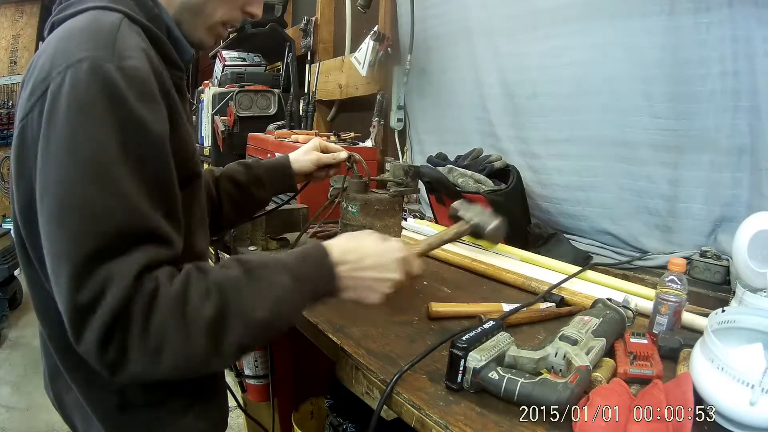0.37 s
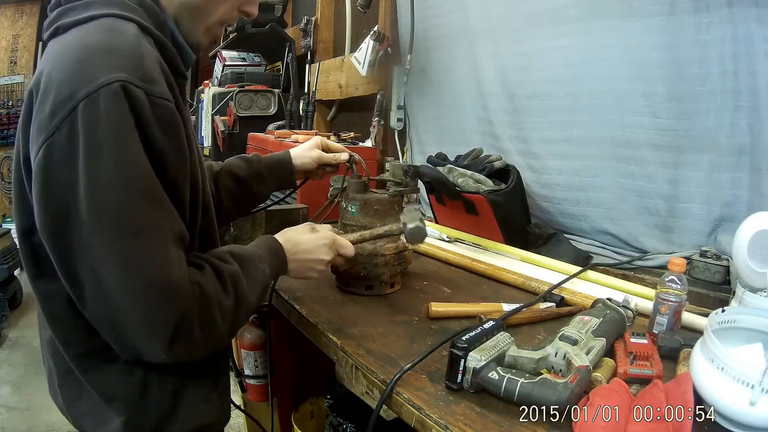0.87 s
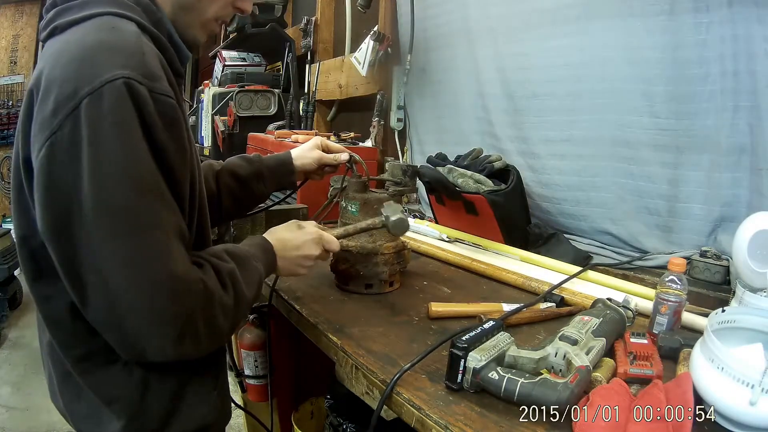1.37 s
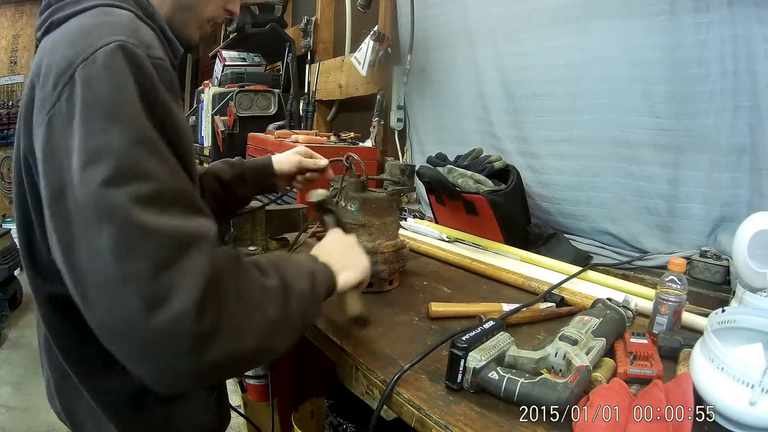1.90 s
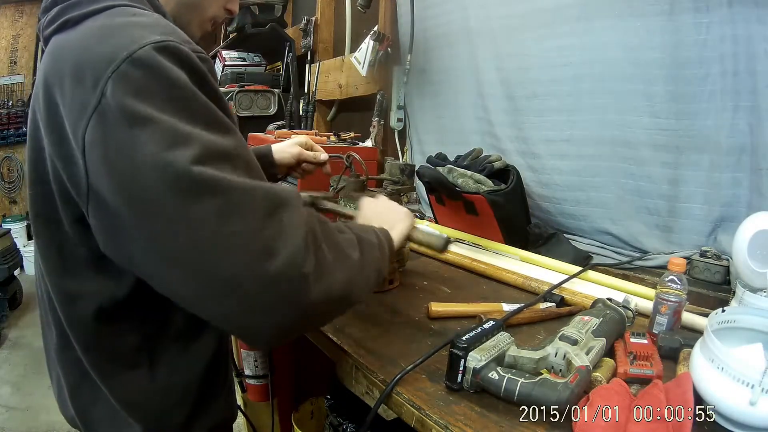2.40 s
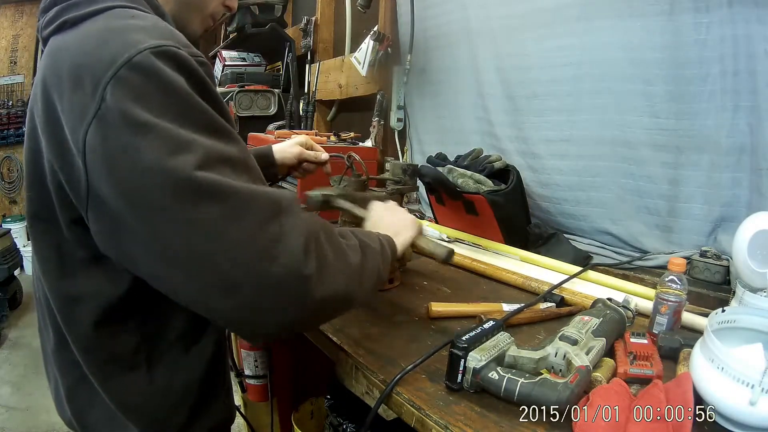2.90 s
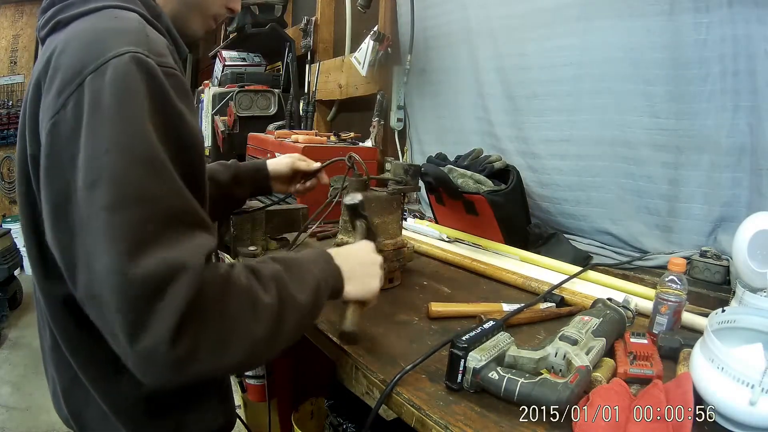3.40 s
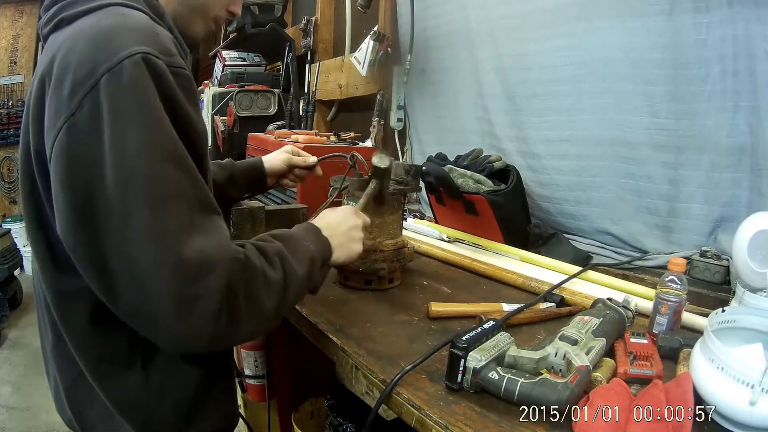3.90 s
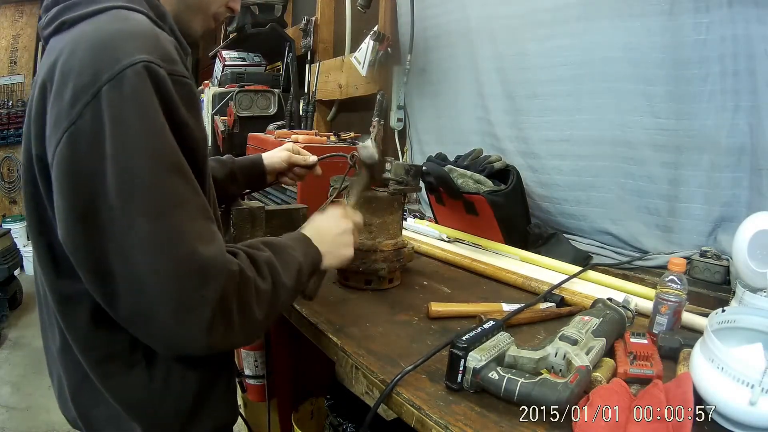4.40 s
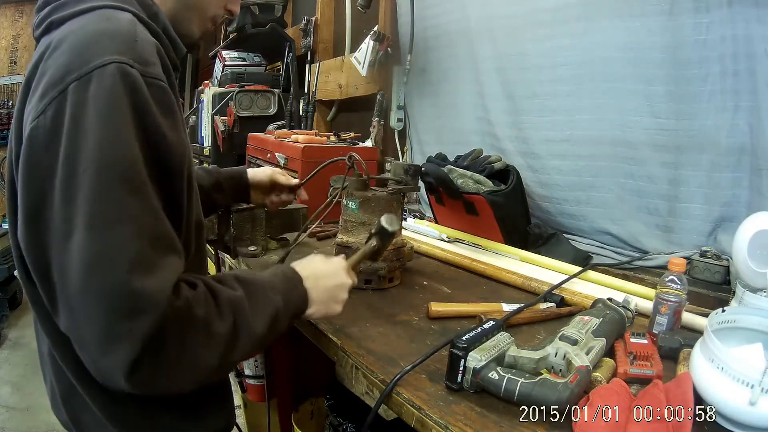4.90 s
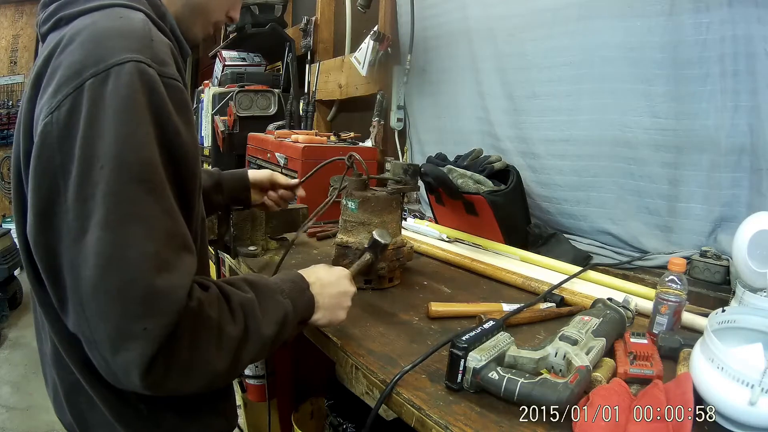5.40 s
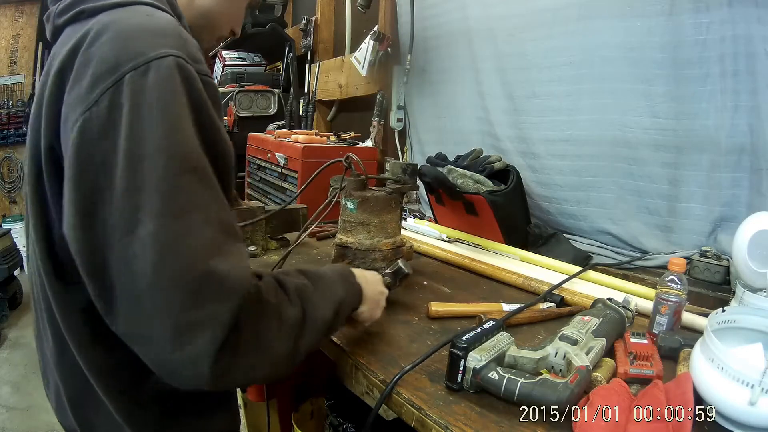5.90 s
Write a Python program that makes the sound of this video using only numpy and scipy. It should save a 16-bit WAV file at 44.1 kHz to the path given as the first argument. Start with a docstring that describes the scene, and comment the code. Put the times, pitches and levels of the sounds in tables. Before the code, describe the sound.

Faint room rumble and thin, bright recorder hiss with a weak electronic whine lie under everything, with tiny scattered ticks. At about 0.04 and 0.08 seconds a tool clacks lightly on a wooden bench. A hammer then strikes a rusty cast metal housing: a soft blow at 0.7, then harder ones at 0.97, 1.2 and 1.45. A second run, sharper and clankier, falls at 2.2, a weaker start, then 2.45, 2.7 and 2.9. After a second's pause three heavier blows come at 3.9, 4.2 and 4.4, each louder, the last hardest and brightest. Every blow is a blunt knock with a short, damped clang, low bench thud and roughly half-second garage tail. The close small recorder clips on the blows and dips afterwards. Quiet follows; faint bumps near 5.45, then a duller, clearer wooden tool clatter at 5.7 to 5.8 fades by 6.

```python
"""Over faint room air and recorder hiss, tools bump on a wooden bench in a garage, with tiny ticks about.
A hammer then knocks in three quick runs on a rusty cast pump housing on that bench; tools bump again after.
Housing and bench are struck modes, the rusty wall's clang is dying noise, and the garage carries a noise tail.
A small recorder overloads on the blows, ducks its gain after them and turns its hiss down in the quiet."""
import sys
import numpy as np
from scipy import signal
from scipy.fft import rfft, irfft, next_fast_len
from scipy.io import wavfile
from scipy.ndimage import uniform_filter1d, minimum_filter1d

SR = 44100
rng = np.random.default_rng(int(sys.argv[2]) if len(sys.argv) > 2 else 0)


def linear_from_db(decibels):
    """Turn decibels (scalar or array-like) into linear amplitude factors; 0 gives 1."""
    return 10 ** (np.asarray(decibels, float) / 20)


def wav_out(sig):
    """Save sig, one row per channel (or a flat mono array), as 16-bit PCM at SR to the path in sys.argv[1]."""
    wavfile.write(sys.argv[1], SR, np.round(np.clip(np.atleast_2d(sig).T, -1, 1) * 32767).astype(np.int16))


N = 265923   # samples

# Hammer blows. Each row: start in seconds, strength in dB at the flange, clank in dB over that.
BLOWS = [(0.6987, -12, -2), (0.9738, 2.5, -4.5), (1.218, 2.5, -3), (1.45, 5.5, -2), (2.185, -6, 1.5),
         (2.442, 3.5, 5), (2.6921, 4.5, 5), (2.9299, 4, 7.5), (3.9211, 6.5, -7.5), (4.1878, 11.5, -3),
         (4.4375, 15.5, 4.5)]
# Tools bumping on the bench. Each row: start in seconds, level in dB, brightness in dB per octave,
# rattle decay in seconds, extra boom in dB.
BUMPS = [(0.037, -22.5, 1, 0.011, -17.5), (0.084, -24.5, -5.5, 0.0054, -21), (0.186, -56, 10, 0.013, 19),
         (5.445, -52, -7, .006, -13), (5.476, -38.5, -7.5, 0.0054, -21), (5.695, -16.5, 2, 0.0096, 2),
         (5.761, -22.5, 1.2, 0.017, 1.5), (5.815, -36.5, 5.5, 0.015, -3), (5.926, -49, 8.5, 0.043, 29.5),
         (6.01, -53, -5, 0.0065, 20)]


def table(points, hz):
    """Reads (Hz, value) points on a log frequency axis."""
    points_hz, values = np.array(points).T
    return np.interp(np.log(hz), np.log(points_hz), values)


def ring(clicks, hz, t60):
    """A mode: a unit click sets a sine of height 1 ringing, down 60 dB after t60 seconds."""
    loss = linear_from_db(-60 / (t60 * SR))
    turn = 2 * np.pi * hz / SR
    return signal.lfilter([0, np.sin(turn)], [1, -2 * loss * np.cos(turn), loss * loss], clicks + 1e-18)


def struck(clicks, hz, t60, build_s):
    """A mode whose swing takes a moment to build: a short resonance feeds on the long one."""
    return ring(ring(clicks, hz, t60), hz, build_s) * 2 * np.log(1000) / (build_s * SR)


def smooth(x, seconds):
    """One-pole low-pass, started at the first value."""
    r = np.exp(-1 / (seconds * SR))
    return signal.lfilter([1 - r], [1, -r], x - x[0]) + x[0]


def drift(rate):
    """Slow chance: random points of spread 1, rate per second, joined by straight lines."""
    count = int(N / SR * rate) + 2
    points = rng.standard_normal(count)
    return np.interp(np.arange(N) / SR * rate, np.arange(count), points)


def third_octaves():
    """Third-octave band-passes with their centres, from 22 Hz up."""
    edges = 22 * 2 ** (np.arange(30) / 3)
    return [(np.sqrt(low * high), signal.butter(2, [low, high], "band", fs=SR, output="sos"))
            for low, high in zip(edges, edges[1:])]


def coloured(spectrum, together_db, own_db):
    """Noise of a given spectrum whose bands flicker, together and alone; rms 1."""
    white = rng.standard_normal((2, N))
    together = drift(14.0)
    noise = 0
    for k, (hz, sos) in enumerate(third_octaves()):
        flicker = linear_from_db(together_db * together + own_db * drift(30.0))
        noise = noise + flicker * signal.sosfilt(sos, white[k % 2]) / np.sqrt(hz)
    size = next_fast_len(N)
    hz = np.maximum(np.fft.rfftfreq(size, 1 / SR), 1)
    # sqrt(hz) undoes the tilt given to the bands
    shape = np.sqrt(hz) * linear_from_db(table(spectrum, hz))
    noise = irfft(rfft(noise, size) * shape, size)[:N]
    return noise / np.std(noise)


def air():
    """The quiet rumble and rustle of the room, as flickering coloured noise."""
    # Room air. Each row: frequency in Hz, density in relative dB per Hz.
    air_spectrum = [(15, -23.5), (25, -3), (69, -6.5), (160, -17.5), (323, -25.5), (364, -23), (442, -28),
                    (789, -29.5), (911, -30.5), (1190, -34.5), (1670, -35.5), (1790, -36.5), (3880, -36),
                    (4940, -38.5), (8000, -41), (10400, -61), (17600, -120)]
    rms_db = -54
    return linear_from_db(rms_db) * coloured(air_spectrum, together_db=1.2, own_db=1.5)


def hiss():
    """The recorder's own bright hiss and steady-pitched electronic whine of wavering level."""
    # Recorder hiss. Each row: frequency in Hz, density in relative dB per Hz.
    hiss_spectrum = [(4710, -45), (8000, -17), (9520, -15.5), (10000, -12.5), (10400, -4.5), (11300, -11),
                     (11500, -6), (11600, -8), (12500, 1), (13200, -3), (13800, -14), (15200, -7.5),
                     (15600, -21)]
    # Electronic whine. Each row: frequency in Hz, middle level in dB rms ahead of the gain control.
    whine_tones = [(2640, -78), (12048, -62), (14655, -72)]
    hiss_rms_db = -51.5   # ahead of the gain control
    t = np.arange(N) / SR
    whine = sum(np.sqrt(2) * linear_from_db(db + 4.2 * drift(21.0)) * np.sin(2 * np.pi * hz * t)
                for hz, db in whine_tones)
    return linear_from_db(hiss_rms_db) * coloured(hiss_spectrum, together_db=2.2, own_db=1.2) + whine


def bench():
    """A bump is a first contact and a short rattle of smaller ones into the bench modes."""
    # Bench top and the tools on it. Each row: frequency in Hz, relative level in dB, t60 in seconds.
    bench_modes = [(109, -30, 0.1), (188, 1.5, 0.049), (320.4, 12.5, 0.023), (350, -10, 0.082),
                   (459, -0.5, 0.037), (535, 8.5, 0.024), (700, 5.5, 0.017), (798, 6.5, 0.014),
                   (1070, 14.5, 0.0033), (1150, 4, 0.0046), (1514, -5, 0.0081), (1950, -5.5, 0.0059),
                   (2320, -11.5, 0.0042), (3300, -18.5, 0.0025), (3830, -14, 0.0021), (5500, -22, .002)]
    sharp_rattle_s = 0.008   # longer rattles are scrapes with a softer first contact
    contacts_per_s = 2500
    t = np.arange(SR // 4) / SR
    size = N + len(t)
    out = np.zeros(N)
    for hz, level_db, t60 in bench_modes:
        rattle = 0.69 * rng.standard_normal(size) * (rng.random(size) < contacts_per_s / SR)
        clicks = np.zeros(size)
        for s, db, bright_db, rattle_s, boom_db in BUMPS:
            i = round(s * SR)
            tilt_db = bright_db * np.log2(hz / 500)
            low_db = boom_db / (1 + (hz / 300) ** 4)
            gain = linear_from_db(db + level_db - 10.0 + tilt_db + low_db)
            clicks[i:i + len(t)] += gain * np.exp(-t / rattle_s) * rattle[i:i + len(t)]
            clicks[i] -= 0.89 * gain * min(1, sharp_rattle_s / rattle_s)
        out += struck(clicks[:N], hz, t60, build_s=max(0.003, 0.43 / hz))
    # the bench top sends out little below 73 Hz
    out = signal.sosfilt(signal.butter(2, 73, "high", fs=SR, output="sos"), out)
    # a steel tool rings on after the first bump
    first_bump = np.arange(N) == round(BUMPS[0][0] * SR)
    return out + ring(linear_from_db(-31) * first_bump, hz=3200, t60=0.031)


def garage(x):
    """Dense reflections: noise that swells in a few ms and dies band by band, drawn anew for each blow."""
    # Decay of the garage. Each row: frequency in Hz, t60 in seconds.
    garage_t60 = [(60, 0.37), (160, 0.49), (420, 0.53), (1100, 0.45), (2900, 0.47), (7700, 0.37)]
    t = np.arange(SR * 3 // 4) / SR
    # one stretch ahead of the blows, one from each blow, one from the first bump after them
    cuts = [0] + [round(row[0] * SR) for row in BLOWS] + [round(BUMPS[3][0] * SR), N]
    white = rng.standard_normal((2, len(cuts), len(t)))
    tails = sum(signal.sosfilt(sos, white[k % 2]) * linear_from_db(-60 * t / table(garage_t60, hz))
                for k, (hz, sos) in enumerate(third_octaves()))
    # each stretch has paths of its own; the last tail holds those that all share
    tails = tails[:-1] + 0.43 * tails[-1]
    tails = tails * (1 - np.exp(-(t / 0.0013) ** 2))
    out = np.zeros(N + len(t))
    for start, end, tail in zip(cuts, cuts[1:], tails):
        unit_tail = tail / np.sqrt(np.sum(tail ** 2))
        out[start:end + len(t) - 1] += signal.fftconvolve(x[start:end], unit_tail)
    return out[:N]


def ticks():
    """Tiny bright ticks, in loose clusters, each a click into one short mode."""
    # The clearest of many faint ticks. Each row: start in seconds, click level in dB.
    clear_ticks = [(0.408, -40), (0.4644, -45)]
    faint_db, ticks_per_s = -53, 46   # the rate wavers around this
    chance = ticks_per_s * linear_from_db(4.0 * drift(2.5)) / SR
    clicks = linear_from_db(faint_db) * rng.standard_normal(N) * (rng.random(N) < chance)
    for s, db in clear_ticks:
        clicks[round(s * SR)] = linear_from_db(db)
    return struck(clicks, hz=3780, t60=0.005, build_s=0.0047)


def blow_colours():
    """How hard each blow drives each part, in dB: every run lands on another spot of the housing."""
    # Spots struck, one per run. Each row: boom, thud, wall and rim in dB over the strength,
    # fizz in dB over the clank.
    spots = [(-8, -3, -1, 2, 3), (-3, -3, -2.5, -1, -0.5), (-11.5, -6, -7, -11, -6)]
    new_run_pause_s = 0.5   # a longer pause starts a new run
    boom_per_db = 0.3058   # harder blows shake the bench more: extra dB of boom per dB of strength
    s, strength_db, clank_db = np.transpose(BLOWS)
    run = np.cumsum(np.diff(s, prepend=s[0]) > new_run_pause_s)
    boom_db, thud_db, wall_db, rim_db, fizz_db = np.array(spots)[run].T
    boom_db = boom_db + boom_per_db * strength_db
    flange_db = 0 * s
    parts = [boom_db, thud_db, thud_db, wall_db, flange_db, rim_db, clank_db, clank_db + fizz_db]
    return strength_db[:, None] + np.transpose(parts)


def blow_clicks(colours, hz, db):
    """One click per blow, as strong as its colour is at this frequency."""
    # Where boom, thud (low and high end), wall, flange, rim, clank and fizz sit: frequencies in Hz.
    colour_hz = [70, 120, 300, 900, 1040, 1450, 3500, 5500]
    colour_db = np.array([np.interp(np.log(hz), np.log(colour_hz), row) for row in colours])
    at = np.round(np.array([row[0] for row in BLOWS]) * SR).astype(int)
    clicks = np.zeros(N)
    clicks[at] = linear_from_db(db + colour_db)
    return clicks


def housing(colours):
    """Clear modes, pushed by each blow with a little chance; rust softens the contact, so they build up."""
    # Housing and the bench under it. Each row: frequency in Hz, relative level in dB, t60 in seconds.
    housing_modes = [(62.2, -30.5, 0.7), (87.44, -30, 0.74), (129, -10, 0.17), (182.65, -18.5, 0.2),
                     (295, -26, 0.061), (327, -13.5, 0.17), (371.9, -7.5, 0.12), (550, -25, 0.015),
                     (629, -10, 0.032), (676, -13.5, 0.094), (754, -8, 0.097), (854, -12, 0.047),
                     (947.6, -7, 0.03), (1023, 1.5, 0.02), (1069.5, -11, 0.023), (1172, -9.5, 0.027),
                     (1212, 1, 0.016), (1343, -14.5, 0.087), (1403.3, 0.5, 0.043), (1442.4, -11, 0.06),
                     (1535.7, -5, 0.057), (1610, -16.5, 0.067), (2540, -23, 0.013), (2918, -22.5, 0.02),
                     (3550, -16, 0.011)]
    chance_db = 1.8 * rng.standard_normal((len(BLOWS), len(housing_modes)))
    body = np.zeros(N)
    for k, (hz, level_db, t60) in enumerate(housing_modes):
        build_s = max(0.006, 2.5 / hz)   # low modes take longer to swing up
        body -= struck(blow_clicks(colours, hz, level_db + chance_db[:, k]), hz, t60, build_s)
    return body


def rusty_wall(colours):
    """Clang of modes too many to tell apart: bands of dying noise, and their average over all directions."""
    # Crowded, damped wall modes. Each row: frequency in Hz, relative level in dB, t60 in seconds.
    wall_modes = [(172, 16.5, .06), (205, 2.5, 0.15), (324, 7.5, .04), (470, 7.5, 0.011), (573, 3, 0.019),
                  (742, 8.5, 0.03304), (950, 0.5, 0.043), (1264, 17.5, 0.076), (1450, 2, 0.033),
                  (1740, 7.5, 0.058), (2480, 2.5, 0.067), (3150, 0.5, 0.026), (3614, -2, 0.03),
                  (4870, -13.5, 0.046), (6048, -12, 0.042), (7200, -14.5, 0.021), (8600, -14.5, 0.017)]
    white = rng.standard_normal((2, N))
    clang, even = np.zeros(N), np.zeros(N)
    for k, (hz, level_db, t60) in enumerate(wall_modes):
        push = blow_clicks(colours, hz, level_db - 11.0) + 1e-18
        loss = linear_from_db(-60 / (t60 * SR))
        dying = signal.lfilter([1], [1, -loss], push)
        band = signal.butter(2, [hz / 1.17, hz * 1.17], "band", fs=SR, output="sos")
        clang += signal.sosfilt(band, dying * white[k % 2])
        # the same energy in one pulse
        even += (-1) ** k * signal.sosfilt(band, push) / np.sqrt(1 - loss ** 2)
    return clang, even


def scene():
    """Blows, bumps, garage and air; the clear modes beam forward, the clang spreads all round."""
    colours = blow_colours()
    body = housing(colours)
    clang, even = rusty_wall(colours)
    tools = bench()
    into_room = linear_from_db(-7.0) * body + linear_from_db(-6.0) * even + linear_from_db(-12.5) * clang + linear_from_db(-5.5) * tools
    mix = body + clang + tools + garage(into_room) + ticks() + air()
    return mix[None]


def held_level(x, fall_db_per_s):
    """Level in dB that follows rises at once and sinks at a fixed speed."""
    start_db = -41   # the gain control still remembers an earlier sound
    ramp = fall_db_per_s * np.arange(N) / SR
    power = np.append(linear_from_db(2 * start_db), x[1:] ** 2)
    level_db = 10 * np.log10(smooth(power, 0.0085) + 1e-9)
    return np.maximum.accumulate(level_db + ramp) - ramp


def gain_control(x):
    """Gain ducks late after loud sound and sinks in long quiet; a gate lowers the hiss."""
    duck_db = smooth(-0.7 * np.maximum(held_level(x, 140) + 12.5, 0), 0.024)
    quiet_db = smooth(-0.6 * np.maximum(-45.5 - held_level(x, 54), 0), 0.0088)
    hush_db = smooth(-0.33 * np.maximum(-22 - held_level(x, 90), 0), 0.05)
    # the hiss enters midway, so it takes only part of the ducking
    return x * linear_from_db(duck_db + quiet_db) + hiss() * linear_from_db(0.3 * duck_db + hush_db)


def overload(x):
    """Peaks clip flat, unevenly up and down; the coupling then lets the flat tops sag."""
    x = signal.sosfilt(signal.butter(2, 40, "high", fs=SR, output="sos"), x)
    x = np.clip(x, -0.88, 0.78)
    return x - smooth(x, 0.025)


def treble_left_out(x):
    """The band above about 8.7 kHz is left out around sudden attacks."""
    level_db = 10 * np.log10(smooth(x ** 2, 0.0032) + 1e-9)
    calm = level_db - np.roll(level_db, SR // 200) < 11   # no 11 dB rise within 5 ms
    # out from about 12 ms ahead of an attack to 19 ms after it, with soft edges
    keep = uniform_filter1d(minimum_filter1d(1. * calm, size=1400, origin=150), size=200)
    low = signal.sosfiltfilt(signal.cheby2(16, 25, 8700, fs=SR, output="sos"), x)
    return low + keep * (x - low)


def top_cut(x):
    """Nothing passes above the cut-off."""
    return signal.sosfilt(signal.butter(12, 15780, fs=SR, output="sos"), x)


def record(dry):
    """The small recorder's gain control, hiss and overload; then treble is lost at attacks and above 16 kHz."""
    x = gain_control(dry[0])
    x = overload(x)
    x = treble_left_out(x)
    x = signal.sosfiltfilt(signal.cheby2(12, 50, 16000, fs=SR, output="sos"), x)
    return top_cut(x[None])


dry = scene()
out = record(dry)
wav_out(out)
```